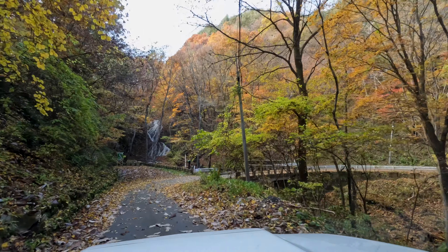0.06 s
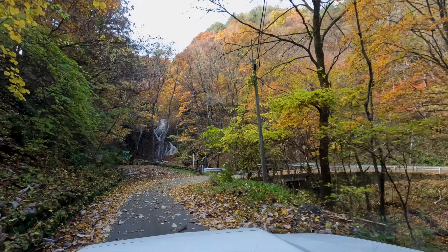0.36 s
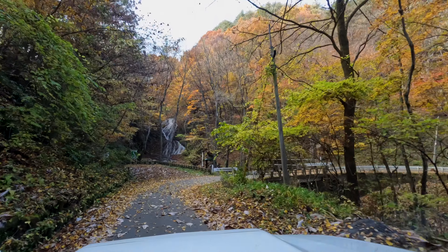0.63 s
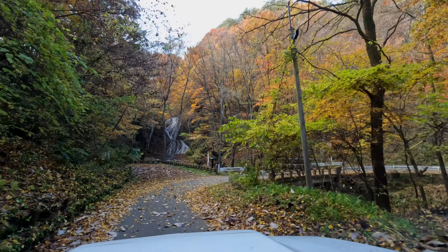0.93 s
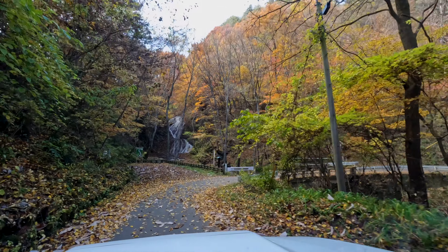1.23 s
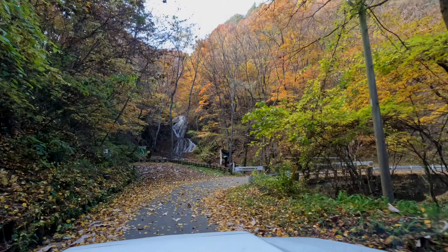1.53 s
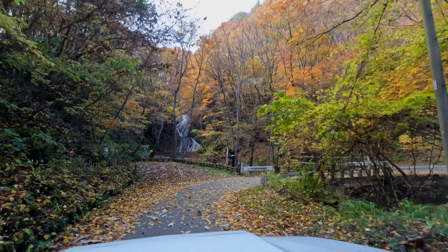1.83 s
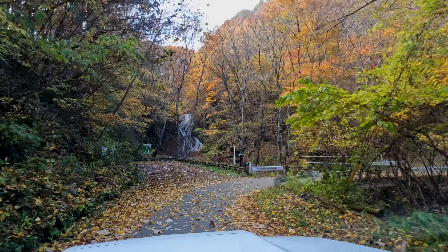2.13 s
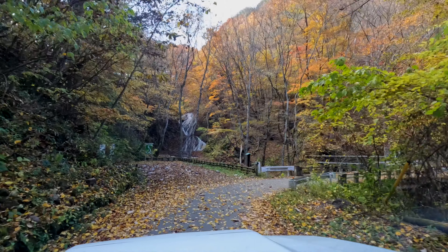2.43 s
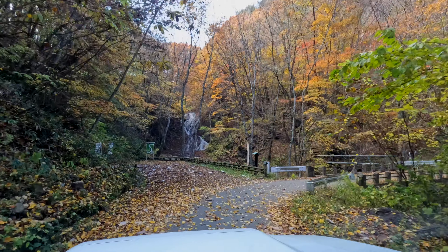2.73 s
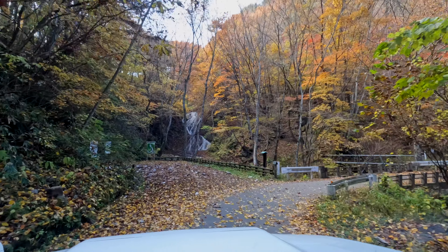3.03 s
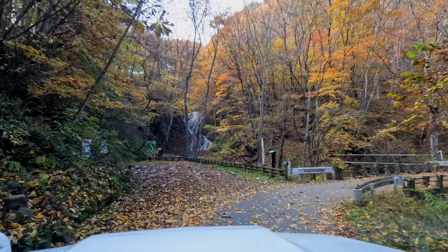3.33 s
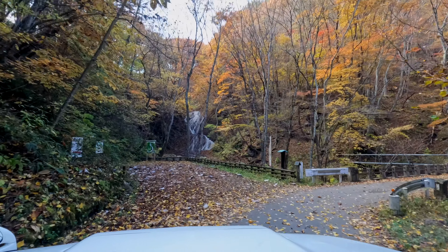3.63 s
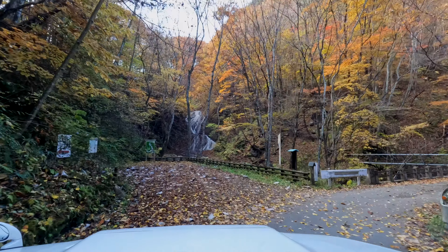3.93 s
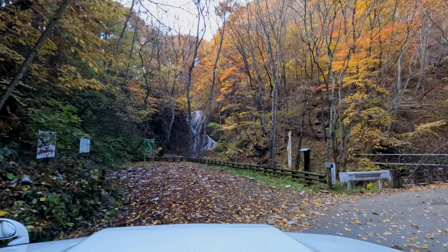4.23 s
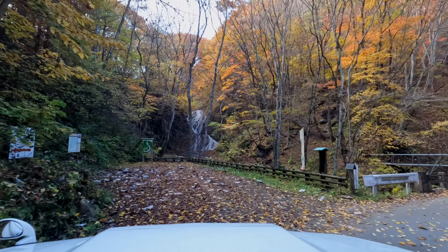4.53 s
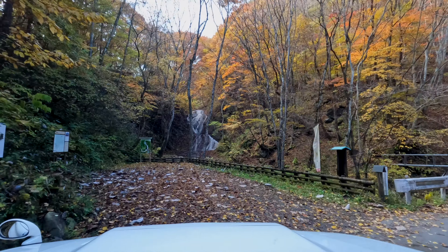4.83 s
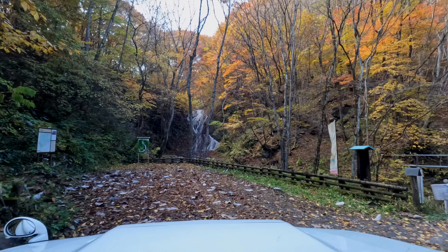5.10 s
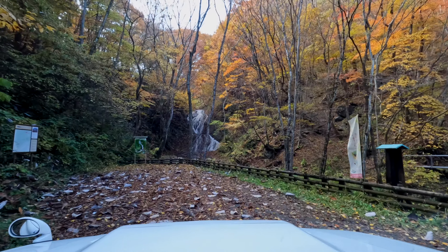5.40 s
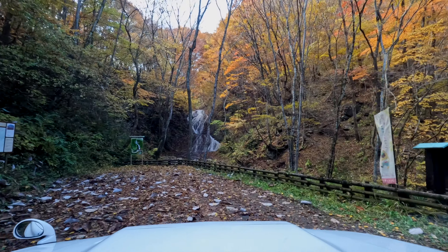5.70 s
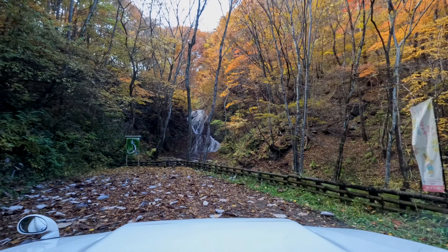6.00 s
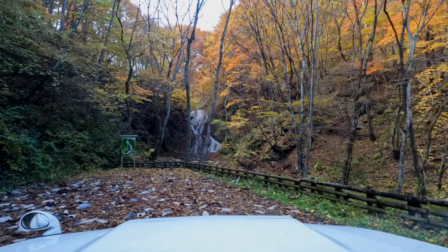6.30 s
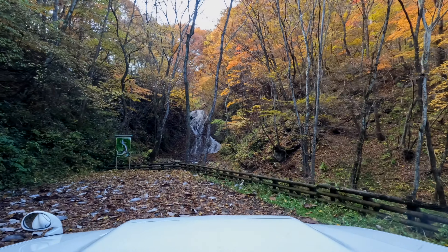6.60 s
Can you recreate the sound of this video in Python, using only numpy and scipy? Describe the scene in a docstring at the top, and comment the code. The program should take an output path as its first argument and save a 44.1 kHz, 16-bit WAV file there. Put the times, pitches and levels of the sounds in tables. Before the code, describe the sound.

From the dashboard of a slowly moving car, a low engine hum and tyre roar continue throughout. A turn signal alternates tick and tock, nearly three clicks a second. Scattered twigs snap under the tyres. At about 1 second, foliage brushes the side and a branch slaps the body sharply. From around 2 seconds, a deep boom builds as asphalt gives way to rough ground. The engine eases near 2.8 seconds and returns lower in pitch around 4. From 3 seconds, crushed leaves hiss and crackle more clearly. Sticks knock and the suspension thumps at about 3.3, 3.5, 4.5 and 5.4 seconds, with another thump near 5.9. Ruts drum the body most heavily around 4.5 and 5.4 seconds. The chassis squeaks faintly a few times between 5 and 6.6 seconds, and the engine pitch rises slightly at the end, the rumble and ticking still going.

```python
"""Engine hum and tyre roar inside a car creeping up a forest lane; the flasher relay ticks on and off.
Foliage brushes the side and a branch slaps the body. Asphalt gives way to leaf litter and rough ground:
the body booms, the suspension thumps, leaves hiss and crackle, twigs snap, sticks knock under the tyres
and the chassis squeaks faintly. Standing waves in the cabin colour every source."""
import sys
import numpy as np
from scipy import signal
from scipy.fft import rfft, irfft, next_fast_len
from scipy.io import wavfile
from scipy.ndimage import uniform_filter1d, map_coordinates

SR = 44100
rng = np.random.default_rng(int(sys.argv[2]) if len(sys.argv) > 2 else 0)


def unload_wav(signal):
    """Save mono or channel-first audio to the path in sys.argv[1] as 16-bit WAV at rate SR, clipped to [-1, 1]."""
    wavfile.write(
        sys.argv[1],
        SR,
        np.round(np.clip(np.atleast_2d(signal).T, -1, 1) * 32767).astype(np.int16),
    )


N = 297675

# engine hum, fourth crank order: time_s, pitch_hz
HUM_PITCH = [(0, 165), (.21, 156), (.48, 154.3), (.68, 145.8), (1.35, 144.5), (1.89, 148.5), (2.42, 148.6),
             (2.77, 144.8), (3, 142), (3.8, 126), (5.5, 123.2), (6.3, 131.7), (6.75, 147)]
# crank orders: cycles_per_turn, level_db
CRANK_ORDERS = [(1, -0.5), (2, -8.5), (3, -2), (4, 0), (6, -15), (7, -9.5)]
# second low tone: time_s, pitch_hz, level_db
WHIRR_TONE = [(0, 134.2, -43.5), (.45, 127.1, -37), (.75, 115.7, -46), (1.1, 122.5, -73),
              (1.45, 125.8, -39.5), (1.7, 120.5, -41.5), (2.1, 124.7, -46), (2.6, 121, -68)]
# body boom and sway: freq_hz, density_db
BOOM_SPECTRUM = [(15, -33.5), (28, -13), (36, -0.5), (42, -3), (49, -5.5), (58, -4.5), (68, -9), (78, -19),
                 (90, -16), (108, -17), (135, -21), (165, -38), (400, -109)]
SWAY_SPECTRUM = [(6, -29), (13, -5.5), (20, 6.5), (29, 3.5), (36, -3.5), (60, -53), (120, -105)]
# floor roar, tread rush, crushed leaves: freq_hz, density_db
ROAR_SPECTRUM = [(40, -25.5), (62, 5.5), (78, 5.5), (92, -1), (108, 3), (128, 2), (146, -4), (168, -5),
                 (188, -0.5), (225, -1), (255, -1.5), (305, -6.5), (370, -7), (430, -12), (510, -13),
                 (630, -24), (1000, -34.5), (2500, -70)]
TREAD_SPECTRUM = [(300, -3.5), (550, 1.5), (750, 2.5), (860, 5), (980, 2), (1150, -1), (1600, -10),
                  (2100, -16), (2800, -29), (4000, -44), (9000, -51.5)]
LEAF_SPECTRUM = [(800, -2.5), (1550, 8.5), (2100, 7), (2750, 4.5), (3800, 1.5), (5200, 0.5), (6200, -1),
                 (7500, -5.5), (8500, -11), (10500, -16), (12200, -16), (13500, -28), (15500, -41.5)]
# floor roar, tread rush, crushed leaves: time_s, level_db
ROAR_ENVELOPE = [(0, -35.5), (.8, -37), (1.45, -34.5), (2, -37), (2.45, -39.5), (2.75, -35.5),
                 (2.95, -35.5), (3.1, -36), (3.9, -33.5), (4.3, -35), (5.2, -34.5), (5.9, -35),
                 (6.75, -35.5)]
TREAD_ENVELOPE = [(0, -53), (.75, -55.5), (1.35, -55), (1.65, -54), (2.3, -57.5), (3.25, -51.5), (5, -52),
                  (6.75, -52)]
LEAF_ENVELOPE = [(0, -68.5), (.7, -66.5), (1.35, -66), (1.65, -72.5), (2, -73.5), (2.25, -67), (3.2, -59.5),
                 (4.5, -56.5), (5.2, -60), (6.1, -58.5), (6.75, -62)]
# relay case, closing and opening: freq_hz, density_db
CLOSE_SPECTRUM = [(500, -37), (1000, -9), (2000, -15.5), (2450, -9.5), (2750, -2.5), (3150, -0.5),
                  (3600, -13.5), (4400, -12), (5000, -3.5), (5850, -16), (6700, -11.5), (7600, -14),
                  (8500, -30), (12000, -26.5), (15500, -40)]
OPEN_SPECTRUM = [(500, -14.5), (800, -6), (1000, 5), (1250, -3), (1700, -5), (2800, -2), (4000, -11.5),
                 (6100, -3.5), (8200, -18.5), (10400, -16.5), (11000, -24), (12000, -20), (13100, -35.5),
                 (15500, -31)]
# relay case modes, closing and opening: freq_hz, level_db, t60_s
CLOSE_RING = [(2730, -2.5, .032), (2960, 1, .03), (3150, 1, .03), (4980, -5.5, .028), (7400, -10, .04),
              (10400, -8, .04), (11700, -6, .05)]
OPEN_RING = [(987, 8.5, 0.04), (2700, -3, .03)]
# ticks, louder midway: time_s, gain_db
TICK_ENVELOPE = [(0, -.5), (2.9, 0), (3.6, 2), (5.1, 2.5), (5.85, 0.5), (6.6, -1.7)]
# twigs snapping: start_s, level_db, centre_hz
TWIG_SNAPS = [(.077, -62, 2500), (0.204, -45, 1300), (.259, -60, 2300), (0.333, -59.5, 4500),
              (0.435, -52.5, 4000), (.508, -62, 4500), (.522, -52.5, 1400), (.552, -67, 5000),
              (.703, -53, 4020), (1.235, -46.5, 2900), (1.24, -47, 1200), (1.384, -53, 800),
              (1.559, -52, 747), (1.652, -50, 798), (1.961, -52, 785), (2.438, -47.5, 3330),
              (2.507, -61, 4000), (3.054, -56, 3500), (3.079, -44, 2300), (3.097, -48, 3160),
              (3.197, -50, 4340), (3.274, -43, 1300), (4.461, -58, 4000), (5.03, -51.5, 3250),
              (5.069, -55, 3500), (5.356, -58, 5000), (5.4355, -45, 2600), (5.946, -46, 1300),
              (6.002, -57, 3060), (6.024, -57, 4950), (6.095, -52, 4000), (6.325, -57, 2970),
              (6.372, -61, 3000)]
# wheels dropping off edges: start_s, level_db
WHEEL_DROPS = [(.36, -37), (2.905, -34.5), (3.275, -31), (3.475, -31), (4.325, -38), (4.528, -31),
               (4.999, -38.5), (5.429, -29), (5.886, -31.5), (6.003, -40)]
# suspension thump, foliage sweep, branch slap: freq_hz, density_db
THUMP_SPECTRUM = [(50, -18), (110, 0.5), (170, 3), (260, 0), (420, -8), (600, -15), (1200, -48.5),
                  (4000, -110)]
FOLIAGE_SPECTRUM = [(1000, -27), (2500, -3), (4500, -2.5), (6500, 0.5), (7600, -6), (8800, -10.5),
                    (12200, -11.5), (13500, -23), (15500, -23)]
SLAP_SPECTRUM = [(250, -17), (380, -18), (530, 9), (800, 2), (1050, 7), (1350, -5), (1750, 8), (2100, 1.5),
                 (2750, 4.5), (3400, -0.5), (4000, 0.5), (4700, -6), (6100, 2), (7400, -6), (8300, -16),
                 (12000, -21.5), (15500, -33.5)]
# bushes passing: peak_s, level_db, swell_s, fade_s
BUSH_SWEEPS = [(1, -61, 0.15, 0.25), (1.34, -69.5, 0.11, 0.09), (5.485, -60, .03, .06)]
# branch tip, then stem: start_s, level_db
BRANCH_SLAPS = [(1.0405, -32), (1.0458, -34)]
# body panel modes: freq_hz, level_db, t60_s
PANEL_MODES = [(537, 6, .083), (953, -6, .05), (1787, -4, .07), (2130, 5, .06), (2680, 4, .06),
               (2977, 2, .06)]
# ruts drumming the body: start_s, level_db, pitch_hz
RUTS = [(2.65, -23.5, 36.5), (3.311, -23, 65.5), (3.3, -34.5, 125), (3.47, -27.5, 60.4), (4.29, -18, 44.3),
        (4.44, -15, 36.7), (4.5, -27, 109.8), (4.609, -14, 40.2), (5.22, -19.5, 66.1), (5.32, -17, 50.7),
        (5.49, -17, 59.2), (5.96, -20, 44.2), (6.02, -20, 56.5), (6.26, -19.5, 52.9)]
# sticks and stones under the tyres: start_s, thud_db, clack_db, crack_db
STICK_KNOCKS = [(3.2503, -38, -47.5, -71), (3.266, -34, -36.5, -53), (3.478, -31, -43.5, -45),
                (4.525, -32, -39.5, -59), (5.428, -40, -50, -65.5)]
# floor thud, woody clack, crack: freq_hz, density_db
THUD_SPECTRUM = [(60, -22), (150, 8), (400, 2.5), (700, -5), (1200, -15.5), (2000, -30), (5000, -53.5),
                 (10000, -90)]
CLACK_SPECTRUM = [(350, -24), (650, 4.5), (850, -2), (1100, 0), (1500, -10.5), (2100, -22), (5000, -49.5)]
CRACK_SPECTRUM = [(700, -31), (3000, 13), (6500, -5), (10000, -45)]
# chassis squeaks: peak_s, half_length_s, level_db, pitch_hz
CHASSIS_SQUEAKS = [(5.08, .055, -56, 955), (5.595, 0.048, -47.5, 987), (5.68, .04, -55, 985),
                   (6.58, .05, -53.5, 1004)]
# cabin resonances and gaps: centre_hz, width_hz, gain_db
CABIN_BANDS = [(724, 31, 4), (861, 47, -5), (966, 61, 2.5), (1500, 280, 2), (1750, 36, 2.5),
               (2190, 62, -3.5), (2800, 330, 2.5), (3160, 40, 3.5), (3330, 350, 0), (4980, 90, 2.5),
               (5900, 60, 3), (7350, 200, 2), (10370, 580, 5)]
# stereo width: freq_hz, side_minus_mid_db
STEREO_WIDTH = [(30, -25.5), (125, -55.5), (250, -29), (500, -15), (1000, -12), (2000, -4), (5000, -4.5),
                (8000, -3.5), (12000, -3)]
# microphone balance: freq_hz, left_minus_right_db
MIC_BALANCE = [(2000, 1), (4500, 0.5), (6500, 0), (8000, 4), (10300, 1.5), (12000, 11.5), (15000, -3.5)]


def amp(db):
    """Decibels to gain."""
    return 10 ** (np.asarray(db) / 20)


def unit(x):
    """Scale to rms 1."""
    return x / np.sqrt(np.mean(x ** 2) + 1e-20)


def seconds(size=N):
    """Time of each sample."""
    return np.arange(size) / SR


def ramp(start_s, length_s):
    """Linear rise from 0 to 1."""
    return np.clip((seconds() - start_s) / length_s, 0, 1)


def along(points, hz):
    """Interpolate on a log frequency axis."""
    knots_hz, values = np.transpose(points)
    return np.interp(np.log(hz + 1), np.log(knots_hz + 1), values)


def curves(rows):
    """Per-sample curve for each column after time_s."""
    time_s, *columns = np.transpose(rows)
    return [np.interp(seconds(), time_s, column) for column in columns]


def wobble(rate_hz):
    """Smooth curve through unit-variance random knots."""
    knots = rng.standard_normal(int(N * rate_hz / SR) + 4)
    return map_coordinates(knots, [np.arange(N) * rate_hz / SR])


def noise(spectrum, size=N):
    """Coloured stereo noise, rms 1, near mono in the bass."""
    white = rng.standard_normal((2, size))
    n_fft = next_fast_len(size)
    hz = np.fft.rfftfreq(n_fft, 1 / SR)
    width_rad = np.arctan(amp(along(STEREO_WIDTH, hz)))
    shaped = rfft(white, n_fft) * amp(along(spectrum, hz))
    mid, side = irfft(shaped * [np.cos(width_rad), np.sin(width_rad)], n_fft)[:, :size]
    return unit(np.array([mid + side, mid - side]))


def burst(spectrum, attack_s, hold_s, t60_s, size=8192):
    """A blow scattered by the cabin: noise that rises, holds and decays."""
    t = seconds(size)
    decay = amp(-60 * np.maximum(t - hold_s, 0) / t60_s)
    return noise(spectrum, size) * (1 - np.exp(-t / attack_s)) * decay


def ringing(modes, size=8192, attack_s=0.00077):
    """Damped modes, each with its own phase at each microphone."""
    t = seconds(size)
    ring = 0
    for hz, db, t60_s in modes:
        cycles = hz * t + rng.random() + min(hz / 4000, 1) * rng.random((2, 1))
        ring += amp(db - 60 * t / t60_s) * np.sin(2 * np.pi * cycles)
    return ring * (1 - np.exp(-t / attack_s))


def add(track, start_s, sound):
    """Mix a sound into the track."""
    part = track[:, max(round(start_s * SR), 0):][:, :sound.shape[1]]
    part += sound[:, :part.shape[1]]


def resonance_db(hz, centre_hz, width_hz, peak_db):
    """Bell-shaped boost or cut."""
    return peak_db / (1 + (2 * (hz - centre_hz) / width_hz) ** 2)


def engine(base_db=-42, coast_db=-13, waver_db=1.03):
    """Crank orders through the bulkhead, weak when coasting; the fourth drones near a cabin resonance."""
    lift_s, resume_s, pedal_s = 2.776, 3.84, 0.22
    coasting = ramp(lift_s, pedal_s) - ramp(resume_s, pedal_s)
    hum_hz, = curves(HUM_PITCH)
    crank_hz = hum_hz / 4
    turns = np.cumsum(crank_hz * (1 + .002 * wobble(12))) / SR
    hum = 0
    for order, level_db in CRANK_ORDERS:
        drone_db = resonance_db(order * crank_hz, centre_hz=142.55, width_hz=7.4, peak_db=7)
        gain = amp(level_db + drone_db + waver_db * wobble(10))
        hum += gain * np.sin(2 * np.pi * (order * turns + rng.random()))
    return np.sqrt(2) * amp(base_db + coast_db * coasting) * hum


def whirr():
    """A second low tone comes and goes, beating against the hum."""
    hz, db = curves(WHIRR_TONE)
    gain = np.sqrt(2) * amp(db + 2.2 * wobble(8.2))
    return gain * np.sin(2 * np.pi * (np.cumsum(hz) / SR + rng.random()))


def jolts(spectrum, give=4.6):
    """Body motion evened out by the suspension; more give passes bigger lurches."""
    motion = noise(spectrum)
    swing_power = uniform_filter1d(np.abs(signal.hilbert(motion[0])) ** 2, SR // 16)
    return unit(motion / np.sqrt(np.abs(swing_power) + give))


def body(rough_from_s=1.644, rough_over_s=2.01, worsen_db_per_s=1.23):
    """Boom and sway grow as asphalt gives way to ever rougher ground."""
    rough = ramp(rough_from_s, rough_over_s)
    asphalt = 1 - rough
    boom_db = -38 * asphalt - 27.5 * rough
    sway_db = -46.5 * asphalt - 21.5 * rough
    worsen_db = worsen_db_per_s * np.maximum(seconds() - rough_from_s - rough_over_s, 0)
    return amp(worsen_db) * (amp(boom_db) * jolts(BOOM_SPECTRUM) + amp(sway_db) * jolts(SWAY_SPECTRUM))


def rut_envelope(start_s, rise_s=0.061):
    """Jolt of a rut: swells to 1, then dies away."""
    age = np.maximum(seconds() - start_s, 0) / rise_s
    return (age * np.exp(1 - age)) ** 2


def tyres(rut_lift_db=0.1):
    """Treads rush over the lane; their roar comes through the floor."""
    tread_db, = curves(TREAD_ENVELOPE)
    roar_db, = curves(ROAR_ENVELOPE)
    roar_db += rut_lift_db * sum(rut_envelope(start_s) for start_s, _, _ in RUTS)
    roar = amp(roar_db + 0.73 * wobble(11)) * noise(ROAR_SPECTRUM)
    rush = amp(tread_db + 1.45 * wobble(22.01)) * noise(TREAD_SPECTRUM)
    return roar + rush


def crackle(rate_hz, spread_db):
    """Tiny random leaf fractures, mostly weak, scattered by the cabin."""
    sizes = amp(spread_db * rng.exponential(size=N).clip(0, 4))
    fractures = (rng.random(N) < rate_hz / SR) * sizes * rng.choice([-1, 1], N)
    scatter = burst(LEAF_SPECTRUM, attack_s=0.00014, hold_s=.001, t60_s=0.03, size=2048)
    return unit(signal.oaconvolve(fractures[None], scatter, axes=1)[:, :N])


def leaves(litter_ref_db=-56):
    """Crushed leaves hiss and crackle; lone cracks stand out where the litter is thin."""
    litter_db, = curves(LEAF_ENVELOPE)
    litter = unit(noise(LEAF_SPECTRUM) + 0.45 * crackle(rate_hz=1100, spread_db=0.5))
    lone_db = -75 + 0.45 * (litter_db - litter_ref_db)
    lone = amp(lone_db) * crackle(rate_hz=38, spread_db=6)
    return amp(litter_db + 0.9 * wobble(20)) * litter + lone


def relay_click(spectrum, modes, ring_db, touch_db, seat_db, seat_s=.0018):
    """The armature touches, then seats: two snaps from the right and a dry rattle of the case."""
    click = burst(spectrum, attack_s=0.00037, hold_s=0.0094, t60_s=0.058) + amp(ring_db) * ringing(modes)
    pan_right = amp([[-6], [0]])
    for start_s, db in [(0, touch_db), (seat_s, seat_db)]:
        snap = burst(spectrum, attack_s=0.0001, hold_s=0.0014, t60_s=0.008)
        add(click, start_s, amp(db) * snap * pan_right)
    return click


def flasher(close_s=.0179, open_s=.3648, period_s=.72715):
    """The relay closes and opens in strict time, much alike each cycle."""
    closing = lambda: relay_click(CLOSE_SPECTRUM, CLOSE_RING, ring_db=-17, touch_db=-2, seat_db=5)
    opening = lambda: relay_click(OPEN_SPECTRUM, OPEN_RING, ring_db=0.5, touch_db=-1.5, seat_db=4)
    out = np.zeros((2, N))
    for first_s, db, strike in [(close_s, -46.3, closing), (open_s, -50.3, opening)]:
        common = strike()
        for start_s in np.arange(first_s, N / SR, period_s):
            add(out, start_s, amp(db) * (.8 * common + .6 * strike()))
    return amp(curves(TICK_ENVELOPE)[0]) * out


def twigs(width_oct=0.73):
    """Each twig cracks in a broad band around its own pitch; the cabin dulls the top."""
    out = np.zeros((2, N))
    hz = np.geomspace(100, 16000, 40)
    shelf_db = along([(7300, 3), (8800, -2)], hz)
    for start_s, db, centre_hz in TWIG_SNAPS:
        shape_db = -4.3 * (np.log2(hz / centre_hz) / width_oct) ** 2 + shelf_db
        snap = burst(np.c_[hz, shape_db], attack_s=0.00044, hold_s=0.0013, t60_s=0.042)
        add(out, start_s, amp(db) * snap)
    return out


def thumps():
    """A wheel drops off an edge; the suspension passes a dull thump to the floor."""
    out = np.zeros((2, N))
    for start_s, db in WHEEL_DROPS:
        add(out, start_s, amp(db) * burst(THUMP_SPECTRUM, attack_s=0.0025, hold_s=0.01, t60_s=0.14))
    return out


def foliage():
    """Leaves sweep the side, swelling as each bush nears and fading behind it."""
    t = seconds()
    contact = 0
    for peak_s, db, swell_s, fade_s in BUSH_SWEEPS:
        width_s = np.where(t < peak_s, swell_s, fade_s)
        contact += amp(db) * np.exp(-((t - peak_s) / width_s) ** 2)
    return contact * amp(0.88 * wobble(30)) * noise(FOLIAGE_SPECTRUM)


def branch(ring_db=-17):
    """A woody slap briefly rings the body panel."""
    out = np.zeros((2, N))
    for start_s, db in BRANCH_SLAPS:
        slap = burst(SLAP_SPECTRUM, attack_s=0.0013, hold_s=0.004, t60_s=0.063)
        add(out, start_s, amp(db) * (slap + amp(ring_db) * ringing(PANEL_MODES)))
    return out


def ruts():
    """Each rut swells a low cabin resonance."""
    return sum(amp(db) * rut_envelope(start_s) * np.sin(2 * np.pi * hz * (seconds() - start_s))
               for start_s, db, hz in RUTS)


def sticks():
    """A stick under a tyre thuds through the floor, clacks and cracks."""
    out = np.zeros((2, N))
    for start_s, thud_db, clack_db, crack_db in STICK_KNOCKS:
        thud = amp(thud_db) * burst(THUD_SPECTRUM, attack_s=0.00081, hold_s=0.012, t60_s=0.057)
        clack = amp(clack_db) * burst(CLACK_SPECTRUM, attack_s=0.0014, hold_s=0.0066, t60_s=0.05)
        crack = amp(crack_db) * burst(CRACK_SPECTRUM, attack_s=0.0003, hold_s=0.0036, t60_s=0.061)
        add(out, start_s, thud + clack + crack)
    return out


def squeaks():
    """Brief, slightly wavering rings of the chassis."""
    out = 0
    for peak_s, half_length_s, db, hz in CHASSIS_SQUEAKS:
        phase_rad = 2 * np.pi * np.cumsum(hz * (1 + 0.0089 * wobble(63))) / SR
        envelope = np.exp(-((seconds() - peak_s) / half_length_s) ** 2)
        out += amp(db) * envelope * np.sin(phase_rad)
    return out


def cabin(x):
    """Standing waves between glass and trim colour all sources alike."""
    n_fft = next_fast_len(N + SR // 2)
    hz = np.fft.rfftfreq(n_fft, 1 / SR)
    gain_db = sum(resonance_db(hz, *band) for band in CABIN_BANDS)
    return irfft(rfft(x, n_fft) * amp(gain_db), n_fft)[:, :N]


def scene():
    """All sources, heard from the dashboard."""
    car = engine() + whirr() + body() + ruts() + thumps() + tyres() + squeaks() + flasher()
    return cabin(car + leaves() + foliage() + branch() + twigs() + sticks())


def record(dry):
    """Band-limited microphone pair, brighter on the left."""
    top_hz, fade_in_s = 15400, .004
    n_fft = next_fast_len(N + SR // 2)
    hz = np.fft.rfftfreq(n_fft, 1 / SR)
    balance_db = along(MIC_BALANCE, hz) * np.minimum(hz / 2000, 1)
    tilt = amp(np.outer([.5, -.5], balance_db))
    spectrum = rfft(dry * ramp(0, fade_in_s), n_fft)
    return irfft(spectrum * tilt * (hz < top_hz), n_fft)[:, :N]


dry = scene()
out = record(dry)
unload_wav(out)
```